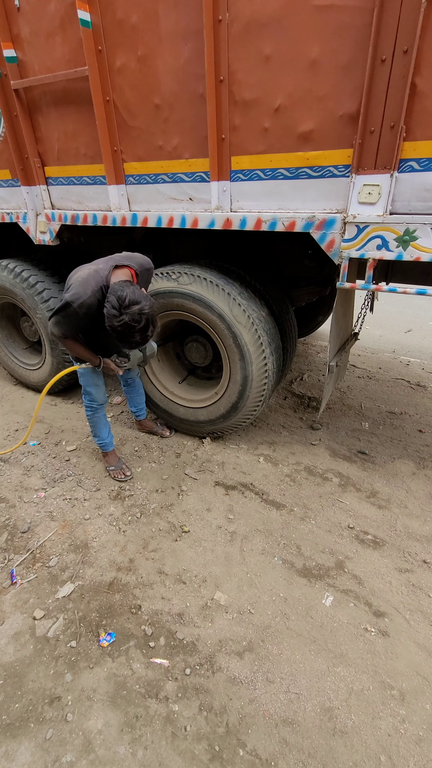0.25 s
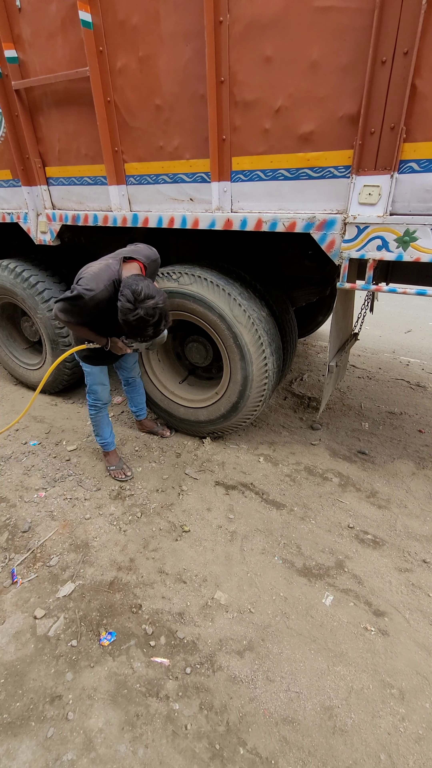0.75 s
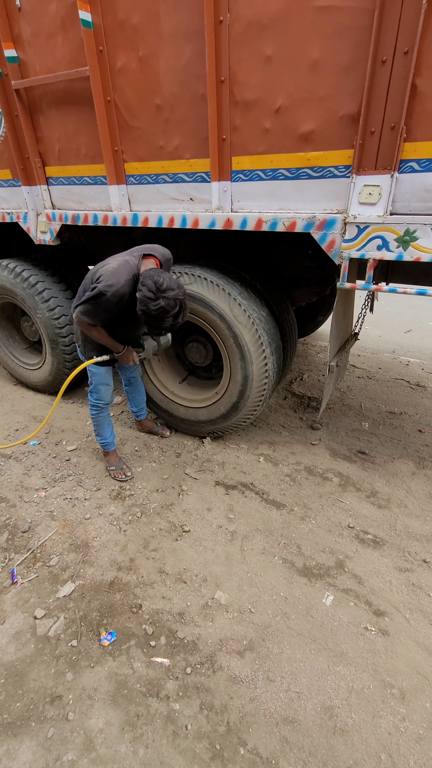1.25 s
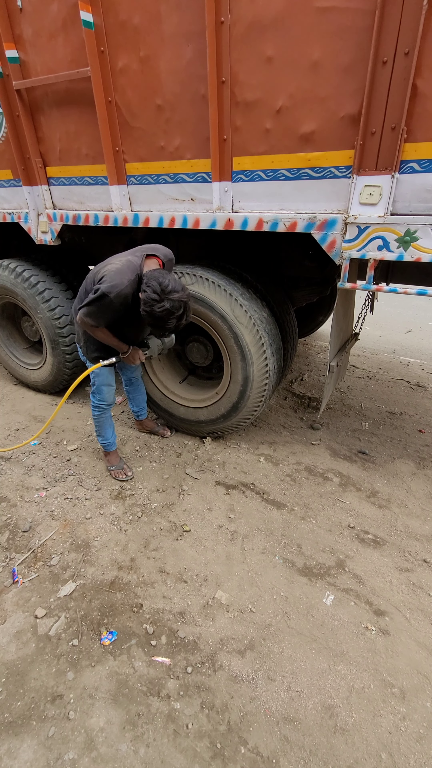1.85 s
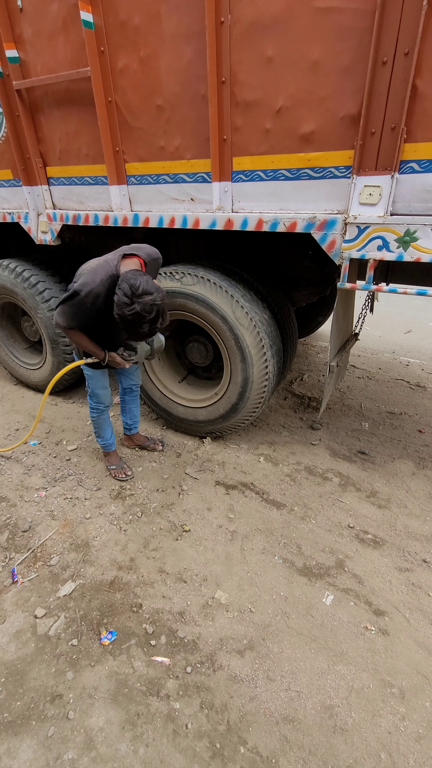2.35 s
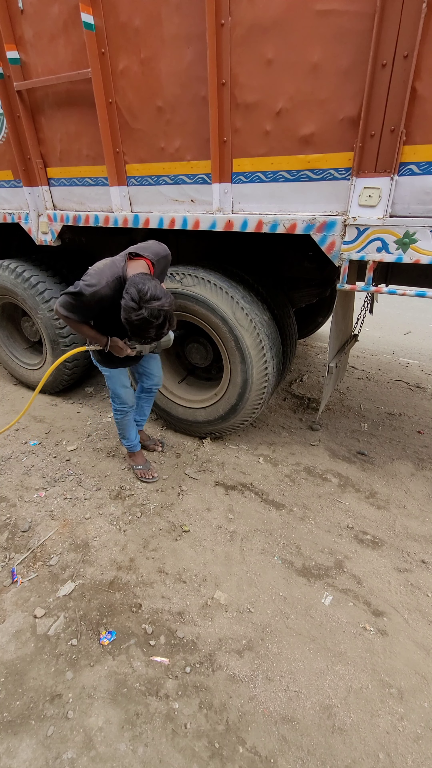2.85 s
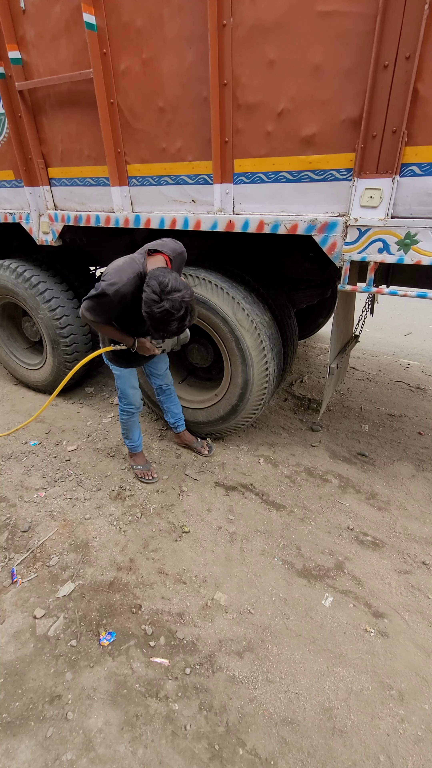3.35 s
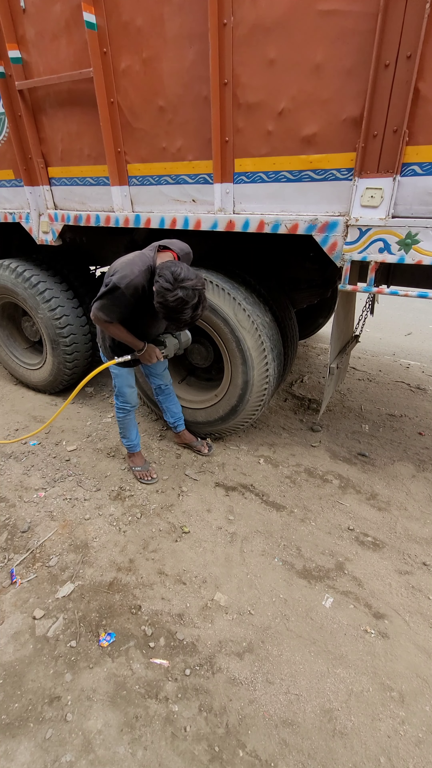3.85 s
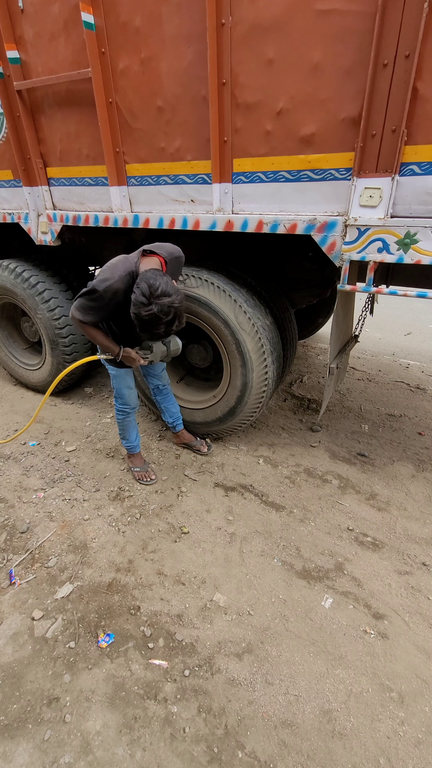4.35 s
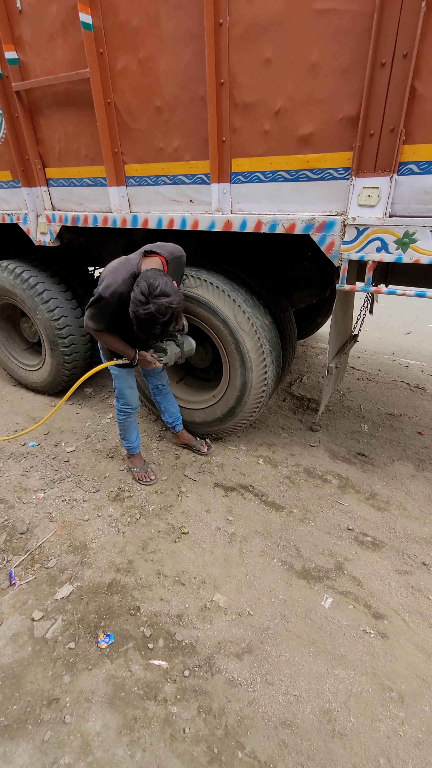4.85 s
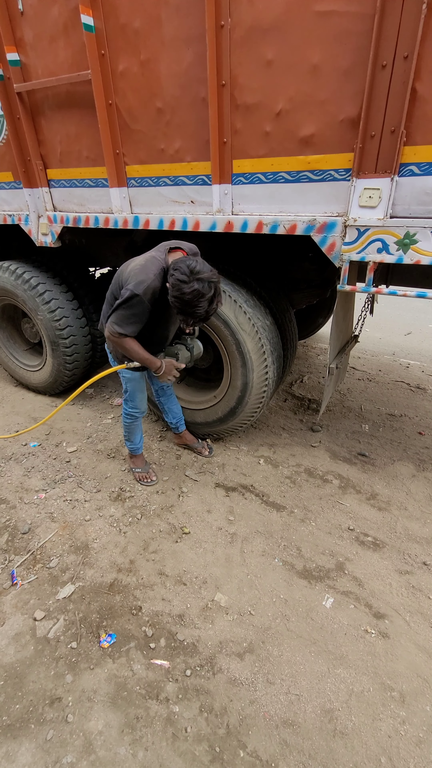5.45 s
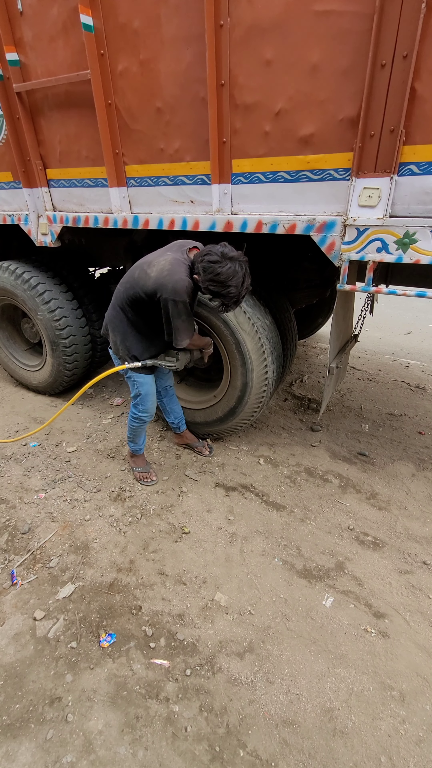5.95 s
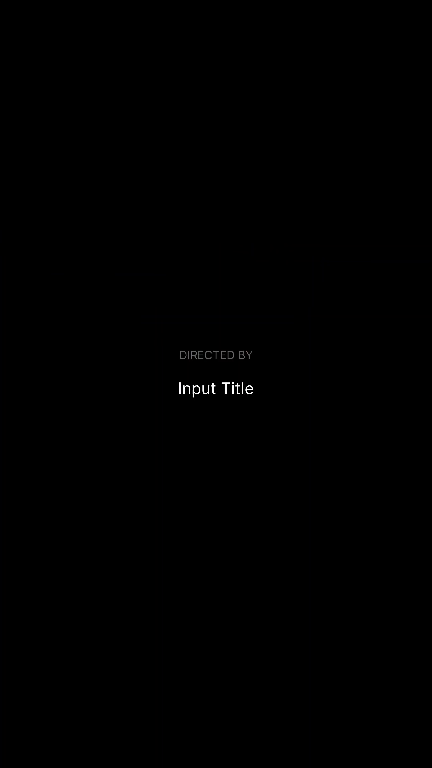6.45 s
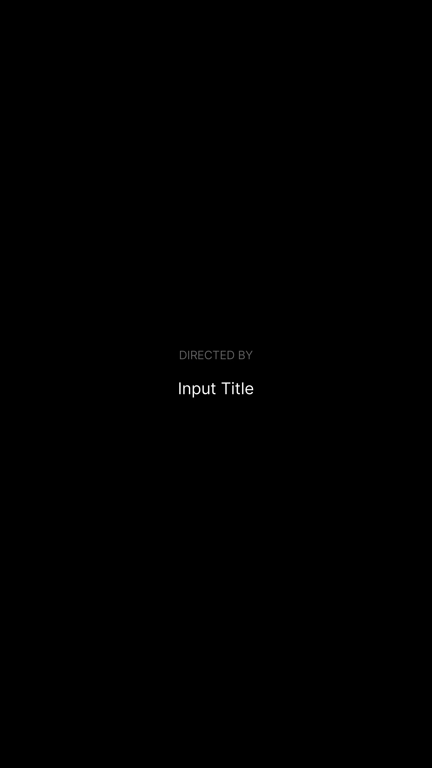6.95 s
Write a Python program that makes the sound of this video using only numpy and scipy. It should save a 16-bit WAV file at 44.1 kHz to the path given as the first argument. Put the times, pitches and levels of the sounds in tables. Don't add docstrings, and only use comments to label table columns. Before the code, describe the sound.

Outdoors in a yard, a phone hears an air impact wrench on truck wheel nuts. A burst already under way stops at once, the socket rings and clinks, then a second burst of about a second hammers fast. A compressor chugs and a hose hisses quietly while a lorry pulls away. A shorter, louder third burst follows, then light clinks and background swelling up before abrupt silence.

```python
import sys
import numpy as np
from scipy import signal
from scipy.fft import rfft, irfft, next_fast_len
from scipy.io import wavfile
from scipy.ndimage import uniform_filter1d, map_coordinates

SR = 44100
rng = np.random.default_rng(int(sys.argv[2]) if len(sys.argv) > 2 else 0)


def output_pcm(signal):
    pcm = np.clip(np.atleast_2d(signal).T, -1, 1) * 32767
    wavfile.write(sys.argv[1], SR, np.round(pcm).astype(np.int16))


def gain_from_decibels(decibels):
    exponent = np.asarray(decibels, float) / 20
    return 10 ** exponent


N = 317608
T = np.arange(N) / SR

# (pressed [s], released [s], exhaust [dB], first air re exhaust [dB], free vane rate [Hz])
BURSTS = [
    (-.01, 0.118, -23, 3.5, 137.4),
    (1.21, 2.135, -21, 0, 138.3),
    (3.56, 4.006, -20, 1, 143.9),
]
# (time [s], peak [dB], thud re peak [dB])
BLOWS = [(0.0273, -21.5, -18), (0.0902, -10, -13.5), (1.2334, -24, -28), (1.307, -15.5, -10),
         (1.353, -11, -11.5), (1.4465, -12, -15), (1.5442, -12, -11.5), (1.642, -14.5, -13.5),
         (1.737, -15.5, -17.5), (1.834, -11, -35.5), (1.938, -11, -24.5), (2.045, -12, -21),
         (2.1429, -11, -15), (3.6332, -12.5, -12.5), (3.6807, -7.5, -13), (3.7623, -8, -12),
         (3.8433, -11, -13.5), (3.9285, -10, -10.5), (4.0093, -11.5, -19)]
# (time [s], peak [dB])
CHATTER = [(1.2814, -23), (1.3259, -12), (1.6264, -14.5), (1.7879, -17.5), (1.9225, -10), (2.0164, -20.5),
           (2.0914, -19)]
# (time [s], peak [dB], pitch [Hz])
WHEEL_NOTES = [(1.3544, -23.5, 1500), (1.4486, -20.5, 1852), (1.5464, -12.5, 2405), (1.6411, -24.5, 2670),
               (1.7373, -27, 2644), (1.8352, -14, 2073), (1.9383, -17.5, 1711), (2.0429, -15, 2480),
               (2.1435, -28.5, 1996), (3.6302, -17.5, 1849), (3.682, -21, 1550), (3.7633, -13.5, 2400),
               (3.8437, -12.5, 2366), (3.9275, -16, 2042), (4.0094, -28, 2254)]
# (frequency [Hz], density [dB per Hz])
EXHAUST_SPECTRUM = [(360, -2.5), (620, -5), (970, -7.5), (1540, -8), (1690, -6.5), (2340, -4.5), (2940, -8),
                    (4020, -3.5), (4930, -5.5), (6200, -2), (8940, -7.5), (9970, -3), (12000, 0),
                    (15800, -1.5)]
# (centre [Hz], width [Hz], gain [dB])
MUFFLER_PEAKS = [(60, 35, -8.5), (132, 63, -4.5), (270.2, 140, 1), (383, 90, 4.5), (519, 66, -0.5)]
# (centre [Hz], width [Hz], gain [dB])
RIM_PEAKS = [(1145, 50, -6), (2703, 20, -7), (4403, 45, -4), (4590, 35, 1), (4775, 22, -1),
             (6800, 110, 1.5)]
# (frequency [Hz], density [dB per Hz])
CRACK_SPECTRUM = [(600, -25), (1000, -2.5), (2400, -1), (3200, -5.5), (4600, -0.5), (7000, -2),
                  (8500, -7.5), (16000, -15.5)]
# (frequency [Hz], level [dB], T60 [s])
WHEEL_MODES = [(1150, -4, .1), (2703, -7, .1), (4590, -1, .1), (4775, -5, .1), (6800, -6, .08)]

# (time [s], level [dB])
YARD_SWELL_DB = [(.35, 2.5), (.6, -1), (.76, 3.5), (.95, 2.5), (1.15, 5.5), (2.3, 7), (2.5, 5), (2.93, 5.5),
                 (3.14, 6), (3.32, 10), (3.46, 20), (3.55, 18), (4.2, 5), (4.3, 0.2), (4.63, 0.2), (5.07, 0.9),
                 (5.6, -1), (6.2, -1)]
# (time [s], level [dB])
HOSE_DB = [(.4, -4), (.6, 3), (.76, 3.5), (1.2, 2.5), (2.3, 10), (3.2, 10.5), (3.45, 19.5), (4.2, 1.5),
           (4.63, 1.5), (5.07, -1.5)]
# (centre [Hz], width [Hz], gain [dB])
PUMP_PEAKS = [(340, 50, 3), (432, 80, 1), (637.4, 70, 1), (718, 43, -0.5), (838.7, 55, 3), (953, 50, -4.5),
              (1039, 48, -3.5), (1264, 38, -5)]
# (centre [Hz], width [Hz], gain [dB])
LOW_THROB_PEAKS = [(52.6, 17, -2.5), (75.1, 7.4, 10), (140, 23, -5), (202, 10, -7), (250, 15, -13),
                   (416, 36, 2)]
# (frequency [Hz], density [dB per Hz])
RUMBLE_SPECTRUM = [(45, -28), (62, -1), (107, -4), (180, -2.5), (260, -3), (450, -11), (640, -13),
                   (900, -17.5), (1500, -28.5), (2200, -47)]
# (frequency [Hz], density [dB per Hz])
SHAKE_SPECTRUM = [(15, -43), (30, -15), (42, -4), (54, -1), (70, -6.5), (90, -31)]
# (frequency [Hz], density [dB per Hz])
WASH_SPECTRUM = [(700, -26.5), (1000, -16.5), (1280, -7.5), (1900, -9), (2930, -14.5), (5230, -16.5),
                 (7500, -23), (9500, -32)]
# (frequency [Hz], density [dB per Hz])
LEAK_SPECTRUM = [(6500, -9.5), (7500, -5.5), (8950, -11), (10600, -4.5), (13300, -8.5), (15000, -11),
                 (15900, -14)]

# (start [s], end [s], start pitch [Hz], end pitch [Hz], level [dB])
DRONES = [(0.124, 0.79, 247.8, 233, -52.5), (0.395, 1.105, 68, 64.6, -59), (0.547, .64, 298, 314, -52.5),
          (0.854, 1.201, 262, 250, -52), (3.081, 3.502, 152.8, 129, -44.5),
          (5.329, 5.88, 195.8, 202.2, -58), (6.366, 6.378, 1970, 1980, -67), (6.401, 6.43, 2030, 2090, -71),
          (6.438, 6.462, 2110, 2160, -65.5)]
# (time [s], firing rate [Hz], level [dB])
PULL = [
    (2.15, 37.05, -57),
    (2.364, 38.37, -47.5),
    (2.798, 40.3, -50),
    (3.03, 40.4, -58),
    (3.1, 42, -65),
]
# (multiple of firing rate, level [dB])
PULL_ORDERS = [(2, -5), (5, -9), (6, 0), (7, -5.5), (8, 5.5), (11, -5)]
# (time [s], firing rate [Hz], level [dB])
NEXT_GEAR = [(4.1, 22.5, -55), (4.16, 22.11, -53), (4.83, 23.3, -55.5), (4.97, 23.65, -52),
             (5.1, 24.2, -55), (5.21, 24.09, -60.5), (6.09, 25.9, -65), (6.33, 26.95, -64),
             (6.47, 27.26, -68.5)]
# (multiple of firing rate, level [dB])
NEXT_GEAR_ORDERS = [(3, -9), (5, -6.5), (6, -2.5), (7, 1.5), (8, 0), (9, 0), (10, 2.5), (13, -9.5)]
# (frequency [Hz], gain [dB])
PIPE_GAIN = [(60, 2), (110, -5), (136, 2), (152, -3), (161, 6.5), (180, -8), (202, 3), (228, -11),
             (245, -1), (330, 0)]

# (time [s], peak [dB], knock re peak [dB], T60 [s])
CLINKS = [(0.298, -23, -3.5, 0.05), (0.388, -44.5, -21, 0.032), (0.8105, -44.5, -1.5, 0.15),
          (0.84, -43, 12, 0.055), (0.848, -37.5, 4, 0.1), (1.092, -28.5, -41, 0.048),
          (1.1, -50, -36.5, 0.097), (3.2274, -60, 7.5, 0.083), (3.25, -50.5, 3, .1),
          (3.27, -51, 4.5, 0.097), (3.2923, -35, 3.5, 0.14), (3.339, -33, 5, 0.075),
          (3.3865, -39.5, 14.5, 0.059), (3.403, -25, 9.5, 0.098), (3.4255, -43, 5.5, 0.097),
          (3.5455, -37, 15, 0.13), (4.4487, -64, 21.5, 0.076), (4.866, -43, 7, 0.12),
          (4.875, -42.5, 7, 0.12), (4.885, -41, -11.5, 0.081), (4.986, -44, 7, 0.12),
          (5.003, -34, -0.5, 0.12), (5.0489, -43.5, -8, 0.08), (5.273, -63.5, 22, 0.053),
          (5.8413, -58.5, 18, 0.041)]
# (frequency [Hz], level [dB], T60 [s])
LOOSE_MODES = [(10400, -17, 0.29), (10500, -13, 0.38), (7300, -11.5, 0.029), (11550, -21.5, 0.073)]
# (frequency [Hz], level [dB], T60 [s])
SEATED_MODES = [(3970, -6, .035), (4600, -5.5, .045), (6960, -1.5, 0.035), (8500, -16, .06),
                (11300, -15.5, 0.037)]
# (time [s], frequency [Hz], level [dB], T60 [s])
RINGS = [(0.91, 140, -45.5, .2), (1.2, 330, -47.5, .1), (0.71, 2200, -53, .3), (.55, 1060, -57, 0.33),
         (.386, 4000, -45.5, 0.042), (0.3, 7070, -32.5, .04), (.2, 910, -45, 0.059), (.811, 5700, -48, .06),
         (.849, 11400, -42, 0.067), (.851, 8050, -49.5, 0.13), (.862, 4590, -54.5, 0.3),
         (1.092, 4280, -37, 0.043), (1.092, 4600, -45, 0.036), (1.093, 6820, -31.5, 0.052),
         (4.882, 7300, -48, .09), (4.884, 10200, -50.5, 0.067), (4.879, 2710, -46.5, 0.23),
         (4.886, 3900, -56, 0.086), (4.998, 15000, -50, .18), (5.004, 6200, -45.5, .06),
         (5.004, 4600, -51.5, .08)]
# (time [s], level [dB])
WHISTLE = [
    (3.532, -76),
    (3.545, -43),
    (3.562, -33),
    (3.575, -68.5),
]

# (frequency [Hz], T60 [s])
ECHO_T60 = [(200, 0.67), (2000, 0.46), (10000, 0.3)]
# (frequency [Hz], level [dB])
ECHO_DB = [(150, -22.5), (500, -12), (3000, -9.5), (8000, -12.5), (13000, -14)]
# (frequency [Hz], correlation [-])
NEAR_LIKENESS = [(40, 0.66), (70, 1), (130, 1), (290, 1), (640, 0.45), (1410, 0.44), (3100, 0.5),
                 (6820, 0.16), (10000, .35), (15000, 0.67)]
# (frequency [Hz], correlation [-])
FAR_LIKENESS = [(60, 0.83), (130, 1), (290, 0.94), (640, 0.42), (1410, 0.19), (3100, 0.13), (6820, .15),
                (15000, 0.14)]
# (frequency [Hz], difference [dB])
NEAR_TILT = [(60, -0.5), (200, 0.5), (380, -4), (700, -4.5), (1290, 0), (2380, -2), (4400, -2),
             (8120, -2.5), (15000, 1)]
# (frequency [Hz], difference [dB])
FAR_TILT = [(60, -2), (110, -1), (200, -2.5), (380, -2.5), (700, -4), (1290, -3), (2380, -0.5), (4400, -3),
            (8120, 0.5), (15000, 5.5)]
# (frequency [Hz], phase [rad])
NEAR_LEAD = [(100, .04), (400, 0.16), (1200, 0.39), (2100, 1.4), (5000, 1.6), (8400, 3), (16000, 4.6)]
# (frequency [Hz], phase [rad])
FAR_LEAD = [(100, .05), (400, 0.091), (1200, .5), (4200, 2.4), (16000, 2.8)]
# (frequency [Hz], share lost [-])
LOST_SHARE = [(1800, .03), (2900, .1), (3600, .06), (5000, .04), (6500, .015), (9000, .05), (10500, .01),
              (16000, .01)]
# (time [s], gain [dB])
SILENCE_DB = [(0, 0), (6.467, -0.5), (6.472, -28), (6.486, -41), (6.495, -160), (7.3, -160)]

VALVE_S, SETTLE_S, SPIN_UP_S, RUN_ON_S = 0.00803, 0.08, 0.074, 0.015
MOTOR_DB, SHUT_DB, STILL_DB = -5, -52, -18.5
EXHAUST_FALL_DB_PER_S, MOTOR_FALL_DB_PER_S = 500, 290
START_HZ, COAST_HZ, STALL_DB = 71.9, 101.14, 11
FASTER_DB_PER_HZ = 0.15
THIN_DB, THIN_HZ, FILLS_S = -3.5, 2600, 0.06
CHATTER_DB, CHATTER_T60_S = -9.5, 0.05
NOTE_DB, NOTE_T60_S = -7, 0.05
RUMBLE_DB, WASH_DB, LEAK_DB, RUMBLE_GROWS = -53.5, -66.5, -75.5, 1
SHAKE_DB, SHAKE_GROWS = -60.5, 0.3
PUMP_DB, UNLOADED_DB, LOADS_S, PUMP_GROWS = -56.5, -7, 0.65, 0.49
PUMP_HZ, STROKE_S = 13.0, 5.844
GEAR_TEETH, GEAR_DB, GEAR_S, GEAR_FALL_DB_PER_S = 35.8, -61, (2.38, 3.04), 13
CLACK_DB, CLACK_PER_KNOCK, KNOCK_KNEE_DB = -5, 1.6, -12
SIZZLE_DB = -14.5
SPIT_S, SPIT_DB, SPIT_T60_S = 0.01, -47, 0.045
TOP_HZ = 15850
GAIN_S, GAIN_RAMP_S, GAIN_STEP_DB, GAIN_CREEP_DB_PER_S = 5.076, 0.39, 18, 6.4
BAND_SHARE, HELD_FRAMES, LOST_DB, UNEVEN_DB = 0.045, 5, -32, 1.5


def unit(x):
    return x / np.sqrt(np.mean(x ** 2) + 1e-20)


def along(points, hz):
    f, v = np.transpose(points)
    return np.interp(np.log(hz + 1), np.log(f + 1), v)


def curves(rows):
    s, *cols = np.transpose(rows)
    return [np.interp(T, s, c) for c in cols]


def during(rows, edge):
    start, end = rows[0][0], rows[-1][0]
    return np.interp(T, [start - edge, start, end, end + edge], [0, 1, 1, 0])


def wobble(rate):
    return map_coordinates(rng.standard_normal(int(7.3 * rate) + 9), [T * rate])


def filtered(x, response):
    m = next_fast_len(N + SR // 2)
    return irfft(rfft(x, m) * response(np.fft.rfftfreq(m, 1 / SR)), m)[..., :N]


def resonant(x, peaks):
    def response(f):
        total = 0
        for k, (centre, width, db) in enumerate(peaks):
            damping = 1j * f * width
            total = total + (-1) ** k * gain_from_decibels(db) * damping / (centre * centre - f * f + damping)
        return total
    return filtered(x, response)


def rush(spectrum, alike, patchy_db=0):
    z = signal.stft(rng.standard_normal((2, N)), nperseg=512)[2]
    field = uniform_filter1d(rng.standard_normal(z.shape[1:]), size=6, axis=0)
    field = uniform_filter1d(field, size=10, axis=1)
    pair = signal.istft(z * gain_from_decibels(patchy_db * unit(field)), nperseg=512)[1][:, :N]

    def response(hz):
        turn = np.arccos(np.clip(along(alike, hz), -1, 1)) / 2
        colour = gain_from_decibels(along(spectrum, hz)) * (hz < spectrum[-1][0])
        return colour * [np.cos(turn), np.sin(turn)]
    mid, side = filtered(pair, response)
    return unit(np.array([mid + side, mid - side]))


def decays(times, db, t60, rise):
    out, u = np.zeros(N + SR), np.arange(SR // 2) / SR
    for s, level, length in zip(times, db, t60):
        out[round(s * SR):][:len(u)] += gain_from_decibels(level - 60 * u / length) * (1 - np.exp(-u / rise))
    return out[:N]


def ringing(s, db, modes, scatter=1, beating=0.68):
    u, out = np.arange(SR // 2) / SR, np.zeros(N + SR)
    strike = np.zeros(len(u))
    for hz, level, t60 in modes:
        twin_hz = hz * (1 + rng.normal(0, 0.0086))
        twin = np.sin(2 * np.pi * (twin_hz * u + rng.random()))
        decay = gain_from_decibels(db + level + scatter * rng.normal(0, 2.4) - 60 * u / t60)
        strike += decay * (np.sin(2 * np.pi * hz * u) + beating * twin)
    out[round(s * SR):][:len(u)] = strike
    return out[:N]


def pulses(turns, size):
    return np.diff(np.floor(turns), prepend=np.floor(turns[0])) * size


def trigger():
    exhaust, motor = np.full(N, -90.), np.full(N, -90.)
    rate, on = np.zeros(N), np.zeros(N)
    for press, off, exhaust_db, first_db, free_hz in BURSTS:
        live = during([(press - VALVE_S,), (off + 0.2,)], edge=0.011)
        air = np.interp(T - press, [-VALVE_S, VALVE_S, SETTLE_S], [SHUT_DB, first_db, 0])
        air = air - EXHAUST_FALL_DB_PER_S * np.clip(T - off, 0, None)
        spin = np.interp(T - press, [0, SPIN_UP_S], [STILL_DB, 0])
        spin = spin - MOTOR_FALL_DB_PER_S * np.clip(T - off - RUN_ON_S, 0, None)
        speed = np.interp(T, [press, press + SETTLE_S, off, off + 0.11], [START_HZ, free_hz, free_hz, COAST_HZ])
        full_db = exhaust_db + MOTOR_DB + FASTER_DB_PER_HZ * (free_hz - 138)
        exhaust = np.where(live > 0, exhaust_db + air, exhaust)
        motor = np.where(live > 0, full_db + spin, motor)
        rate = np.where(live > 0, speed, rate)
        on = on + live
    return exhaust, motor, rate, on


def stall():
    s = np.transpose(BLOWS)[0]
    gap = np.diff(s, append=9)
    dip_db = STALL_DB * np.clip((gap - 0.06) / 0.04, 0, 1) * np.where(gap < 0.2, 1, 0.5)
    since = T - s[:, None]
    dip = np.interp(since, [0, 0.03, 0.04, 0.052], [0, 1, 1, 0]).T @ dip_db
    slowed = np.interp(since, [0.012, 0.04, 0.11], [0, 1, 0]).T @ dip_db
    return dip, slowed


def vane_motor(turns, motor_db, dip, on):
    puffs = resonant(pulses(turns, gain_from_decibels(2 * wobble(150))), [(328, 280, 0)])
    vanes = unit(on * resonant(puffs, MUFFLER_PEAKS))
    air = rush([(30, 0.0012), (900, 0.0066)], NEAR_LIKENESS, patchy_db=-3.5)
    breath = unit(on * resonant(air, MUFFLER_PEAKS))
    throb = 0.55 * gain_from_decibels(1.5 * wobble(25)) * np.sin(2 * np.pi * turns)
    return gain_from_decibels(motor_db - 2.5 - dip) * (0.58 * vanes + 0.42 * breath + throb)


def exhaust_roar(turns, exhaust_db, dip):
    gate = 1 + 0.28 * np.cos(2 * np.pi * turns)
    level = gain_from_decibels(exhaust_db + 0.5 - 0.11 * dip + 0.39 * wobble(30) + 0.3 * wobble(9.2))
    roar = level * gate * rush(EXHAUST_SPECTRUM, NEAR_LIKENESS, patchy_db=1.5)
    thin = np.zeros(N)
    for press, *_ in BURSTS[1:]:
        thin += np.interp(T - press, [-0.02, -0.01, FILLS_S / 2, FILLS_S], [0, 1, 1, 0])
    lows = filtered(roar, lambda hz: 1 / (1 + (hz / THIN_HZ) ** 6))
    return roar - (1 - gain_from_decibels(THIN_DB * thin)) * lows


def hammer():
    s, db, thud_db = np.transpose(BLOWS)
    crack = decays(s - 0.002, db - 6.5, 0 * s + 0.14, rise=0.0014)
    crack = crack * rush(CRACK_SPECTRUM, NEAR_LIKENESS, patchy_db=-0.5)
    edge = decays(s + 0.0033, db - 10.5, 0 * s + 0.04, rise=0.001)
    edge = edge * rush(CRACK_SPECTRUM, NEAR_LIKENESS, patchy_db=1.5)
    rattle_s, rattle_db = np.transpose(CHATTER)
    chatter = decays(rattle_s - 0.002, rattle_db + CHATTER_DB, 0 * rattle_s + CHATTER_T60_S, rise=0.001)
    chatter = chatter * rush(CRACK_SPECTRUM, NEAR_LIKENESS)
    thud = decays(s - 0.002, db + thud_db - 1.0, 0 * s + 0.09, rise=0.0013)
    thud = thud * rush([(500, -13.5), (750, 4.0), (1400, -2.5), (2400, -16), (3200, -28.5)], NEAR_LIKENESS)
    return crack + edge + chatter + thud


def wheel():
    s, db, _ = np.transpose(BLOWS)
    out = sum(ringing(t, level - 29.0, WHEEL_MODES) for t, level in zip(s, db))
    out = out + ringing(0, db[1] - 30, [(2700, 0, 0.3)], scatter=0)
    out = out + ringing(s[1], db[1] - 22, [(2703, 0, 0.55), (4620, -10, 0.6)], scatter=0, beating=0.05)
    out = out + ringing(s[12], db[12] - 30, [(4590, 0, 0.6)], scatter=0, beating=0.1)
    for t, level, hz in WHEEL_NOTES:
        out = out + ringing(t, level + NOTE_DB, [(hz, 0, NOTE_T60_S)], scatter=0)
    return out * gain_from_decibels([[1.5], [-1.5]])


def wrench():
    exhaust_db, motor_db, free_hz, on = trigger()
    dip, slowed = stall()
    vane_hz = free_hz * np.clip(1 - 0.04 * slowed, 0.4, 1) * (1 + 0.025 * wobble(60))
    turns = np.cumsum(vane_hz) / SR
    motor = vane_motor(turns, motor_db, dip, on)
    roar = exhaust_roar(turns, exhaust_db, dip)
    rim = gain_from_decibels(exhaust_db - 13) * unit(resonant(rush([(900, 0), (8000, 0)], NEAR_LIKENESS), RIM_PEAKS))
    return on * (motor + roar + rim) + hammer() + wheel()


def compressor(swell_db, turns):
    pump_db = PUMP_DB + PUMP_GROWS * swell_db + np.interp(T - LOADS_S, [0, 0.1], [UNLOADED_DB, 0])
    strokes = pulses(turns, gain_from_decibels(1.2 * wobble(40)))
    strokes = strokes + 0.51 * pulses(turns - 0.36, gain_from_decibels(0.92 * wobble(40)))
    strokes = strokes + 0.16 * pulses(turns - 0.68, gain_from_decibels(2.7 * wobble(40)))
    knocks = unit(resonant(resonant(strokes, PUMP_PEAKS), PUMP_PEAKS))
    low_throb = resonant(pulses(2 * turns + 0.6, gain_from_decibels(2.0 * wobble(30))), [(220, 380, 0)])
    churn = unit(resonant(rush([(80, 0.0055), (1500, 0.00058)], FAR_LIKENESS), PUMP_PEAKS))
    pump = gain_from_decibels(pump_db + 3.5) * (0.6 * knocks + 0.5 * churn)
    pump = pump + gain_from_decibels(pump_db - 3.5) * unit(resonant(low_throb, LOW_THROB_PEAKS))
    return pump + gain_from_decibels(-11) * truck_echo(pump)


def air_leaks(turns):
    leak_db = LEAK_DB + curves(HOSE_DB)[0]
    valve = gain_from_decibels(4.5 * np.tanh(2.2 * np.cos(2 * np.pi * (turns + 0.12))) + 1.5 * wobble(12))
    hiss = rush([(12000, -33.5), (13800, -7.5), (14800, 2.5), (15800, -8.5)], FAR_LIKENESS, patchy_db=1.0)
    spit = gain_from_decibels(leak_db - 9.0) * valve * hiss
    return spit + gain_from_decibels(leak_db + 3.5) * rush(LEAK_SPECTRUM, FAR_LIKENESS, patchy_db=1.1)


def road(swell_db):
    rumble_db = RUMBLE_DB + RUMBLE_GROWS * swell_db
    rumble = gain_from_decibels(rumble_db + 0.5 + 0.6 * wobble(10)) * rush(RUMBLE_SPECTRUM, FAR_LIKENESS, patchy_db=1.1)
    shake_db = SHAKE_DB + SHAKE_GROWS * swell_db
    shake = gain_from_decibels(shake_db + 1.8 * wobble(4.7)) * rush(SHAKE_SPECTRUM, FAR_LIKENESS)
    wash_db = WASH_DB + swell_db
    wash = gain_from_decibels(wash_db + 3.5 + 0.7 * wobble(12)) * rush(WASH_SPECTRUM, FAR_LIKENESS, patchy_db=1.1)
    return rumble + shake + wash


def yard():
    swell_db, = curves(YARD_SWELL_DB)
    turns = (T - STROKE_S) * PUMP_HZ
    return compressor(swell_db, turns) + air_leaks(turns) + road(swell_db)


def drones():
    out = np.zeros(N)
    for start, end, from_hz, to_hz, db in DRONES:
        hz = np.interp(T, [start, end], [from_hz, to_hz]) * (1 + 0.008 * wobble(10.0))
        fade = during([(start,), (end,)], edge=min(0.04, 0.5 * (end - start)))
        out += fade * gain_from_decibels(db + 2.5 + 1.3 * wobble(19)) * np.sin(2 * np.pi * np.cumsum(hz) / SR)
    return out


def engine(rows, orders, pipe):
    hz, db = curves(rows)
    phase = 2 * np.pi * np.cumsum(hz) / SR
    out = np.zeros(N)
    for k, level in orders:
        gain = gain_from_decibels(db + 0.5 + level + along(pipe, k * hz) + 0.76 * wobble(17.0))
        out += gain * np.sin(k * phase + 2 * np.pi * rng.random())
    return during(rows, edge=0.038) * out, phase


def lorry():
    pulling, phase = engine(PULL, PULL_ORDERS, [(1, 0.0064)])
    whine_db = GEAR_DB + 6 - GEAR_FALL_DB_PER_S * (T - GEAR_S[0]) + 2.5 * wobble(22)
    whine = during(np.c_[GEAR_S].T, edge=0.09) * gain_from_decibels(whine_db) * np.sin(GEAR_TEETH * phase + 0.7 * wobble(30))
    return pulling + whine + engine(NEXT_GEAR, NEXT_GEAR_ORDERS, PIPE_GAIN)[0]


def valve_spit():
    times = [press - SPIT_S - 0.003 for press, *_ in BURSTS[1:]]
    spits = decays(times, [SPIT_DB + 2.0] * 2, [SPIT_T60_S] * 2, rise=0.0023)
    spit = spits * rush([(1500, -20.5), (2500, -8.5), (7500, -6.5), (9000, -7.5), (11000, 2), (13000, -12.5),
                         (15900, -12.5)], NEAR_LIKENESS)
    whistle = gain_from_decibels(curves(WHISTLE)[0]) * during(WHISTLE, edge=0.002)
    return spit + whistle * rush([(6000, -19.5), (10000, -7), (13000, -2), (15900, 0)], NEAR_LIKENESS)


def socket_rings():
    s, db, _, _ = np.transpose(CLINKS)
    rings = ringing(s[0], db[0] - 0.5, LOOSE_MODES, scatter=0, beating=0.1)
    for t, hz, level, t60 in RINGS:
        rings = rings + ringing(t, level, [(hz, 0, t60)], scatter=0)
    rings = rings + sum(ringing(t, level - 18, SEATED_MODES) for t, level in zip(s, db))
    return rings * gain_from_decibels([[-1.5], [1.5]])


def socket():
    s, db, knock_db, t60 = np.transpose(CLINKS)
    clack_db = CLACK_DB + CLACK_PER_KNOCK * np.minimum(knock_db - KNOCK_KNEE_DB, 0)
    clink = decays(s - 0.003, db - 1.0, t60, rise=0.0026)
    clink = clink * rush([(3000, -18.0), (3800, -1.5), (4400, 1.0), (5600, -8.0), (7000, -0.5), (8000, -5.5),
                          (9000, -10.5)], NEAR_LIKENESS)
    clack = decays(s - 0.003, db + clack_db + 1.0, t60, rise=0.003)
    clack = clack * rush([(900, -15), (1400, 0), (2700, -1), (3600, -10)], NEAR_LIKENESS)
    knock = decays(s, db + knock_db - 6.5, 1.5 * t60, rise=0.0033)
    knock = knock * rush([(150, -23.5), (300, 7.5), (500, 2.0), (1000, -4.5), (1500, -23.0)], NEAR_LIKENESS)
    sizzle = decays(s - 0.003, db + SIZZLE_DB + 5.5, t60, rise=0.003)
    sizzle = sizzle * rush([(8000, -30), (10000, -0.5), (11500, 0.5), (13000, -9.5), (15000, -5.5),
                            (15900, -8.0)], NEAR_LIKENESS)
    return clink + clack + knock + sizzle + socket_rings()


def truck_echo(x):
    hz, t, z = signal.stft(rng.standard_normal((2, SR // 2)), SR, nperseg=256)
    tail = signal.istft(z * gain_from_decibels(-60 * t / along(ECHO_T60, hz)[:, None]), SR, nperseg=256)[1]
    return signal.fftconvolve(x, tail / np.linalg.norm(tail[0]), axes=1)[:, :N]


def tilted(x, tilt, lead):
    side = np.array([[0.5], [-0.5]])
    return filtered(x, lambda hz: gain_from_decibels(along(tilt, hz) * side) * np.exp(1j * along(lead, hz) * side))


def starved(x):
    hz, t, z = signal.stft(x, SR, nperseg=1024)
    band = np.floor(np.log(hz + 1) / BAND_SHARE).astype(int)
    count = band[-1] + 1
    offset = rng.integers(0, HELD_FRAMES, count)
    block = (np.arange(len(t)) + offset[band, None]) // HELD_FRAMES
    luck, error = rng.random((count, len(t))), rng.standard_normal((count, len(t)))
    share = along(LOST_SHARE, np.exp(np.arange(count) * BAND_SHARE))
    db = LOST_DB * (luck < share[:, None]) + UNEVEN_DB * error
    gain = gain_from_decibels(db[band[:, None], block] * (hz > 1800)[:, None])
    return signal.istft(z * gain, SR, nperseg=1024)[1][:, :N]


def scene():
    tool = wrench() + socket() + valve_spit()
    echo = filtered(truck_echo(tool), lambda hz: gain_from_decibels(along(ECHO_DB, hz)))
    near = tilted(tool + echo, NEAR_TILT, NEAR_LEAD)
    far = tilted(yard() + drones() + lorry(), FAR_TILT, FAR_LEAD)
    return near + far


def roll_off(x):
    return signal.sosfilt(signal.butter(12, 16990, fs=SR, output="sos"), x)


def record(dry):
    gain_db = GAIN_STEP_DB * np.clip((T - GAIN_S) / GAIN_RAMP_S, 0, 1)
    gain_db = gain_db + GAIN_CREEP_DB_PER_S * np.clip(T - GAIN_S - GAIN_RAMP_S, 0, 0.7)
    phone = starved(filtered(dry, lambda hz: hz < TOP_HZ) * gain_from_decibels(gain_db))
    return roll_off(phone * gain_from_decibels(curves(SILENCE_DB)[0]))


dry = scene()
out = record(dry)
output_pcm(out)
```